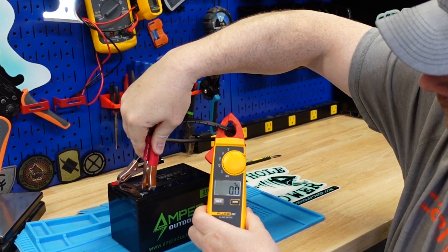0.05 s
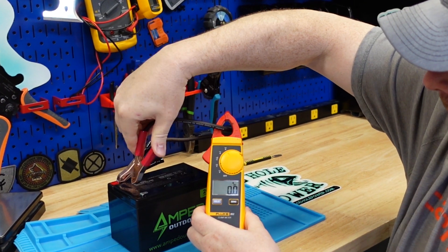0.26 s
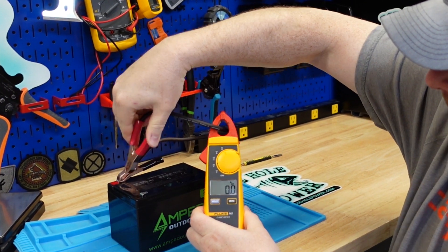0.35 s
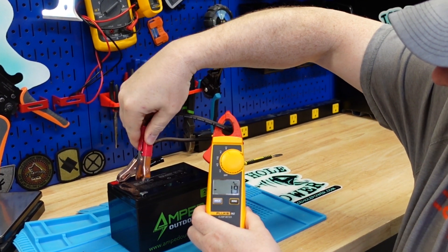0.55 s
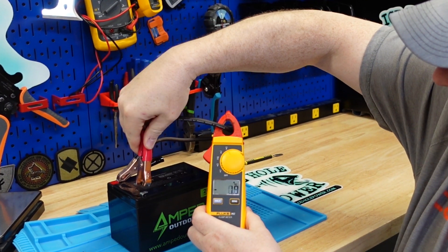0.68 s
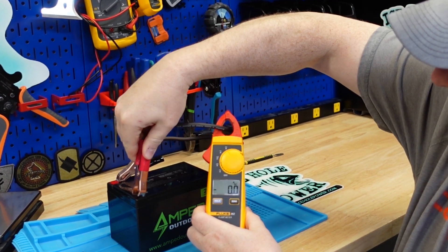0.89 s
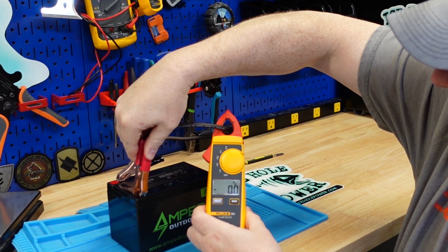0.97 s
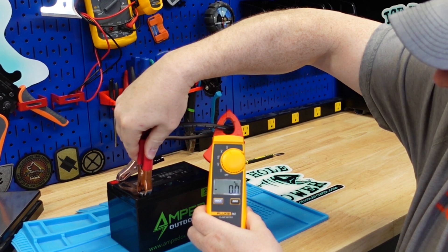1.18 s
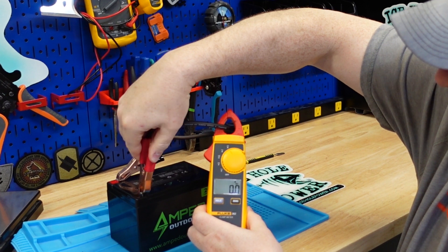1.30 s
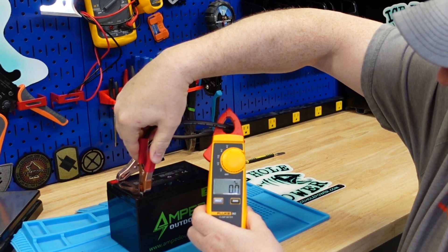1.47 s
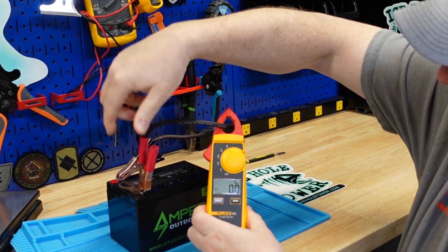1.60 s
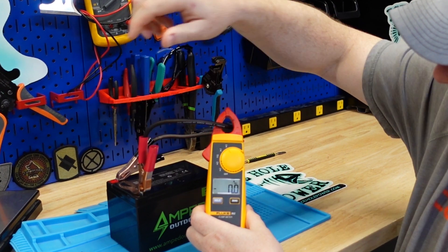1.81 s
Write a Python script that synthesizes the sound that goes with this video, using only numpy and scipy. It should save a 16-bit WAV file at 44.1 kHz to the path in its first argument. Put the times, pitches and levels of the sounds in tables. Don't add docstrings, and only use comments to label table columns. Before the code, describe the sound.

A metal spring clamp clacks on a battery. At 0.2 s a dark knock leads into a loud bright snap at 0.25 s, with a brief spring ring and low bench thud. Near-quiet follows. Strong hollow knocks come at 0.9 and 1.1 s with short tooth scrapes, then a clattering snap around 1.35 s. Light ticks end by 1.7 s. Faint fan, hum and hiss; close, dry small room, mono.

```python
import sys
import numpy as np
from scipy import signal
from scipy.io import wavfile
from scipy.ndimage import uniform_filter1d

SR = 44100
rng = np.random.default_rng(int(sys.argv[2]) if len(sys.argv) > 2 else 0)


def boost_factor(decibels):
    exponent = np.asarray(decibels, float) / 20
    return 10 ** exponent


def persist_wave(psi):
    counts = np.round(np.clip(psi, -1, 1) * 32767).astype(np.int16)
    wavfile.write(sys.argv[1], SR, np.atleast_2d(counts).T)


N = 81585

# pitch_hz, width_hz, level_db
WHIR_BANDS = [(27.8, 5.1, -64.5), (59, 7.8, -66), (135, 26, -62.5), (169.4, 23, -58.5), (361.8, 7.4, -61),
              (593, 19, -59), (711, 15.4, -56.5), (776.7, 32.4, -49.5), (873, 75, -54.5), (965, 42, -55.5),
              (962, 28, -62), (1672, 32, -67.5)]
# freq_hz, level_db (per Hz)
AIR_COLOUR = [(20, 1), (190, -9.5), (280, -14.5), (560, -11), (800, -12), (1370, -17), (3500, -27.5),
              (5500, -40)]
# freq_hz, level_db (per Hz)
HISS_COLOUR = [(3000, -41), (8000, -40.5), (15000, -43.5)]
# start_s, tooth_db, crack_db
TICKS = [(.1090, -65, -60), (0.2383, -34, -66), (0.6641, -35.5, -71), (.8170, -65, -66),
         (.9470, -31, -32.5), (1.2784, -34.5, -40.5), (1.3385, -53, -42), (1.4581, -27, -39),
         (1.4700, -42, -48), (1.488, -38, -49), (1.5077, -38.5, -44.5), (1.5747, -24, -51),
         (1.591, -46, -50), (1.7110, -55, -55)]
# start_s, case_db, jaw_db, crack_db, tilt_db (per octave)
KNOCKS = [
    (0.1967, -13, -18.5, -18, -11.5),
    (0.8974, -7, -20, -33, -7),
    (0.975, -34, -37, -63, -18),
    (1.1009, -9, -15, -47, 2),
    (1.3133, -20, -31, -65, -4.5),
]
# start_s, level_db, pitch_hz, t60_s
THUDS = [(0.2, -27.5, 39.5, 0.28), (0.258, -25.5, 139, 0.077), (0.332, -39.5, 180.4, 0.32),
         (.898, -26.5, 38, 0.43), (.97, -28.5, 130.6, 0.1), (1.059, -34.5, 50, 0.23),
         (1.102, -29.5, 134, 0.08), (1.15, -30, 38.8, 0.16), (1.345, -32, 135, 0.22),
         (1.39, -41, 102.8, 0.42)]
# start_s, handle_db, jaw_db, crack_db, tilt_db (per octave)
SNAPS = [
    (0.2534, -2, -7, -18, -8),
    (0.2586, -7.5, -19, -7.5, 10.5),
    (1.3431, -21.5, -12, -22, 9),
    (1.346, -16.5, -28, -23, 1),
    (1.3561, -29, -40, -48, -13),
    (1.363, -20.5, -12, -15.5, 1),
    (1.3665, -14, -14, -36, 3),
]
# level_db, pitch_hz, width_hz, t60_s
SPRING_COIL = (-36.5, 8438, 800, 0.094)
# start_s, length_s
SCRAPE_TIMES = [(.905, .035), (.950, .038), (1.065, .035), (1.3560, .009), (1.372, .03)]
# case_db, tilt_db (per octave), grit_db
SCRAPE_TONES = [
    (-36, -7, -67),
    (-31.5, 1, -67),
    (-50, 0, -69),
    (-25.5, 8, -25),
    (-42, -2, -61),
]
# pitch_hz, level_db, t60_s
CASE_MODES = [(282, -15.5, 0.044), (376, -12.5, 0.032), (485, -48, 0.059), (615.4, 5.5, 0.037),
              (842, 2, 0.046), (1025, 9, 0.041), (1122, 7.5, 0.031), (1525, -6.5, 0.049), (1870, -6, 0.024),
              (2060, -1, 0.02), (2320, -15, 0.013), (2830, -50, .01), (3330, -34, .01)]
# pitch_hz, level_db, t60_s
HANDLE_MODES = [(564, -4, 0.067), (656, -20, 0.018), (862, 4.5, .05), (1018, 12.5, .045), (1174, 1.5, .03),
                (1510, -11, .03), (1770, -13.5, 0.029), (2030, -16, .02), (2460, -16, 0.032)]
# pitch_hz, level_db, t60_s
JAW_MODES = [(2510, 6.5, 0.01), (3140, 8.5, 0.011), (3480, 7.5, 0.015), (4750, -17, 0.0092),
             (4960, 3, 0.0071), (5600, -13, 0.015), (6449, -38, 0.011), (8800, 0, 0.0088),
             (8090, -31, 0.0039), (9900, -10, 0.0049), (11730, 1, 0.004), (14200, 9, 0.0078)]
# pitch_hz, level_db, t60_s
TOOTH_MODES = [(2180, -34, .01), (2600, -8, 0.0078), (3110, 4.5, 0.025), (3586, 2, 0.02),
               (4370, -37, 0.0048), (6800, -17, .006)]
# freq_hz, level_db
CRACK_COLOUR = [(300, -37), (1000, 15), (3000, 11.5), (6000, 10), (9000, 8), (12000, 6), (15000, -0.5),
                (20000, -22)]
# delay_s, level_db
ECHOES = [(.0023, -9), (.0055, -7.5), (.0093, -25.5), (0.0148, -27.5)]
# freq_hz, t60_s
ROOM_DECAY = [(250, 0.094), (1000, 0.28), (4000, 0.2), (8500, 0.18), (15000, 0.1)]


def evened(x):
    return x / np.sqrt(np.mean(x ** 2) + 1e-20)


def read(points, hz):
    f, value = np.transpose(points)
    return np.interp(np.log(hz + 1), np.log(f + 1), value)


def add(mix, s, sound):
    part = mix[round(s * SR):][:len(sound)]
    part += sound[:len(part)]


def highpass(x, order, hz):
    return signal.sosfilt(signal.butter(order, hz, "high", fs=SR, output="sos"), x)


def band(pitch_hz, width_hz):
    r = np.exp(-np.pi * width_hz / SR)
    slow = rng.standard_normal(N + SR) + 1j * rng.standard_normal(N + SR)
    for _ in range(2):
        slow = signal.lfilter([1], [1, -r], slow)
    carrier = np.exp(2j * np.pi * pitch_hz * np.arange(N) / SR)
    return evened((slow[SR:] * carrier).real)


def workshop():
    air_db, patch_db, hum_hz, hum_db = -49, 1.2, 60.2, -53
    frames, hz = N // 512 + 6, np.fft.rfftfreq(2048, 1 / SR)
    a, b, patches = rng.standard_normal((frames, 1025, 3)).T
    patches = evened(uniform_filter1d(uniform_filter1d(patches, 20, 0), 6, 1))
    colour_db = read(AIR_COLOUR, hz) - 24.0 * np.log2(np.maximum(hz / AIR_COLOUR[-1][0], 1))
    hiss = boost_factor(read(HISS_COLOUR, hz))[:, None]
    shape = np.hypot(boost_factor(colour_db[:, None] + patch_db * patches), hiss)
    air = signal.istft((a + 1j * b) * shape, nperseg=2048, noverlap=1536)[1]
    hum = boost_factor(hum_db) * np.sin(2 * np.pi * hum_hz * np.arange(N) / SR)
    whir = sum(boost_factor(db) * band(pitch_hz, width_hz) for pitch_hz, width_hz, db in WHIR_BANDS)
    return boost_factor(air_db) * evened(air[:N]) + hum + whir


def ring(modes, tilt_db=0, loose=1):
    detune, uneven_db = 0.03, 2.0
    t, draw = np.arange(SR // 8) / SR, loose * rng.standard_normal((14, 2))
    x = np.zeros(len(t))
    for (hz, db, t60), (level_draw, pitch_draw) in zip(modes, draw):
        t60 = min(t60, 30 / hz + 0.0048, 0.055)
        level_db = db + uneven_db * level_draw + tilt_db * np.log2(hz / 1000)
        x -= boost_factor(level_db - 60 * t / t60) * np.sin(2 * np.pi * hz * (1 + detune * pitch_draw) * t)
    return x / abs(x).max()


def chatter(decay_s):
    x = rng.standard_normal(800) * np.exp(-np.arange(800) / SR / decay_s)
    x[0] = 1.906
    return x / np.linalg.norm(x)


def rattled(tone):
    return np.convolve(tone, chatter(0.0026))


def crack():
    x = chatter(0.00075) + boost_factor(1) * chatter(0.004)
    colour = np.log(boost_factor(read(CRACK_COLOUR, np.abs(np.fft.fftfreq(1024, 1 / SR)))))
    impulse = np.fft.ifft(np.exp(np.conj(signal.hilbert(colour)))).real[:400]
    return np.convolve(x, impulse)


def ticks():
    out = np.zeros(N)
    for s, tooth_db, crack_db in TICKS:
        add(out, s, boost_factor(tooth_db) * rattled(ring(TOOTH_MODES, loose=0.15)))
        add(out, s, boost_factor(crack_db) * crack())
    return out


def blow(body, tilt_db, push_s, low_hz):
    bounces = chatter(0.0013) ** 3
    push = np.exp(-(np.arange(-30, 31) / SR / push_s * 4) ** 2)
    contact = np.convolve(bounces, push)[20:]
    x = highpass(np.convolve(ring(body, tilt_db, loose=0.12), contact), 4, low_hz)
    return x / abs(x).max()


def jaw_blows(rows, body, push_s, jaw_tilt_db, low_hz):
    out = np.zeros(N)
    for s, body_db, jaw_db, crack_db, tilt_db in rows:
        add(out, s, boost_factor(body_db) * blow(body, tilt_db, push_s, low_hz))
        add(out, s, boost_factor(jaw_db) * rattled(ring(JAW_MODES, jaw_tilt_db)))
        add(out, s, boost_factor(crack_db) * crack())
    return out


def knocks():
    return jaw_blows(KNOCKS, CASE_MODES, push_s=0.00017, jaw_tilt_db=-13, low_hz=234)


def bench():
    out, t = np.zeros(N), np.arange(SR // 2) / SR
    for s, db, hz, t60 in THUDS:
        swell = 1 - np.exp(-t / 0.012)
        add(out, s, -boost_factor(db - 60 * t / t60) * swell * np.sin(2 * np.pi * hz * t))
    return out


def snaps():
    return jaw_blows(SNAPS, HANDLE_MODES, push_s=0.00035, jaw_tilt_db=-6.5, low_hz=486)


def spring():
    out, t = np.zeros(N), np.arange(SR // 4) / SR
    db, pitch_hz, width_hz, t60 = SPRING_COIL
    add(out, 0.2590, boost_factor(db - 60 * t / t60) * band(pitch_hz, width_hz)[:len(t)])
    return out


def scrapes():
    slips_per_s = 4000
    out, t = np.zeros(N), np.arange(SR // 4) / SR
    for (s, length_s), (case_db, tilt_db, grit_db) in zip(SCRAPE_TIMES, SCRAPE_TONES):
        chance, force = rng.random((len(t), 2)).T
        drag = np.sin(np.pi * np.minimum(t / length_s, 1) ** 1.5)
        slips = (chance < slips_per_s / SR) * (2 * force - 1) * drag
        add(out, s, boost_factor(case_db) * signal.fftconvolve(ring(CASE_MODES, tilt_db), slips))
        add(out, s, boost_factor(grit_db) * signal.fftconvolve(crack(), slips))
    return out


def clamp():
    return highpass(knocks() + snaps() + ticks() + scrapes() + spring(), 2, 230)


def dense(tail):
    z = signal.stft(tail, nperseg=64)[2]
    phases = np.exp(2j * np.pi * rng.random(z.shape))
    other = signal.istft(abs(z) * phases, nperseg=64)[1][:len(tail)]
    return other * np.linalg.norm(tail) / np.linalg.norm(other)


def room(x):
    tail_db, echo_hz = -11.5, 4170
    taps = np.zeros(SR // 2)
    at = np.arange(60, SR // 2 - 20, 20)
    taps[at + rng.integers(0, 20, len(at))] = rng.choice([-1., 1.], len(at))
    hz, t, z = signal.stft(taps, SR, nperseg=256)
    decay = boost_factor(-60 * t / read(ROOM_DECAY, hz)[:, None])
    tail = signal.istft(z * decay, SR, nperseg=256)[1]
    tail *= boost_factor(tail_db) / np.linalg.norm(tail)
    for s, db in ECHOES:
        add(tail, s, boost_factor(db) * signal.firwin(21, echo_hz, fs=SR))
    turn = np.pi / 2 * np.arange(N) / N
    early = signal.fftconvolve(x * np.cos(turn), tail)
    late = signal.fftconvolve(x * np.sin(turn), dense(tail))
    return x + (early + late)[:N]


def scene():
    return (room(clamp()) + bench() + workshop())[None]


def top_cut(x):
    return signal.sosfilt(signal.butter(12, 16530, fs=SR, output="sos"), x)


def record(dry):
    return top_cut(dry)


dry = scene()
out = record(dry)
persist_wave(out)
```